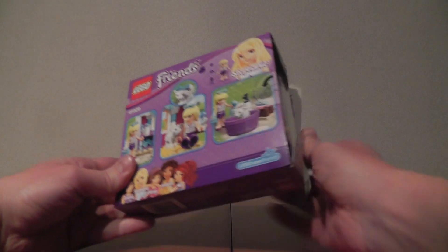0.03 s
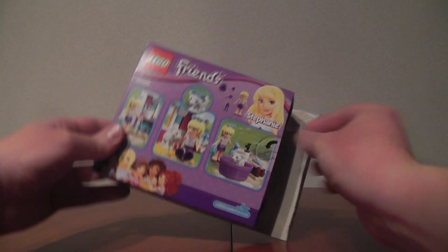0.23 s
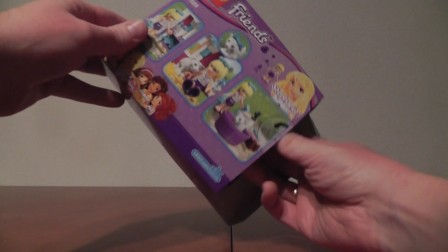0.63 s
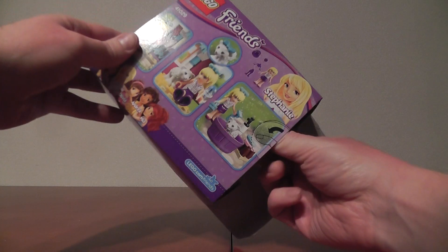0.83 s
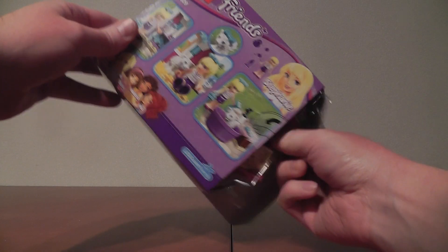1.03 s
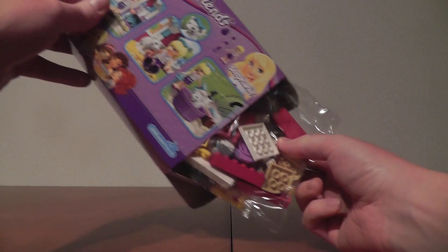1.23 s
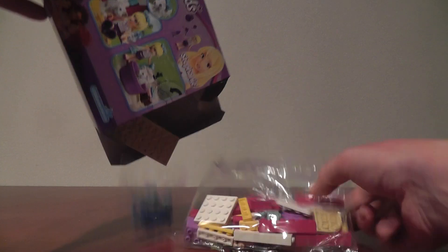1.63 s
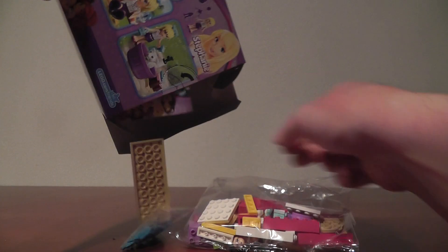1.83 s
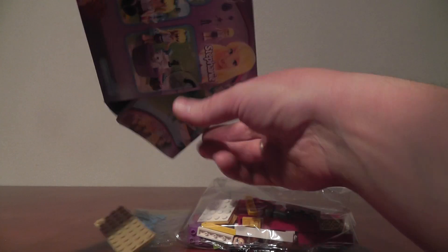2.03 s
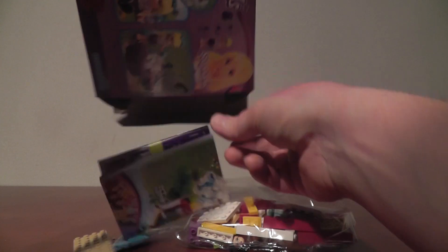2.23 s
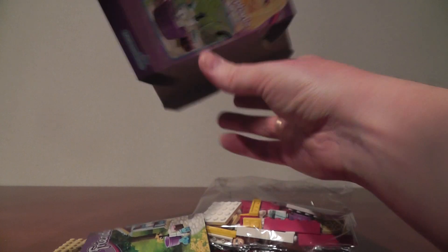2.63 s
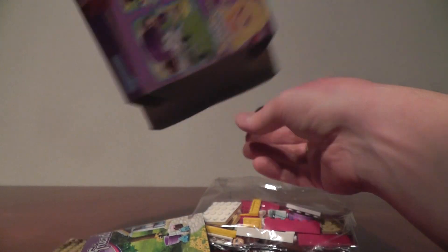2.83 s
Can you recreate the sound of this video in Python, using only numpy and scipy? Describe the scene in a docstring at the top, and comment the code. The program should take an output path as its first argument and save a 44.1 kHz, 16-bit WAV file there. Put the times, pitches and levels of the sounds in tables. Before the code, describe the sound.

A plastic bag of toy bricks crackles close to the microphone as it is pulled from a scraping, knocking cardboard box. It drops on a wooden table, loose parts click after it, and a finger taps the box in a quiet room.

```python
"""A plastic bag of toy bricks, close to the microphone, is pulled from a small cardboard box and
dropped on a wooden table; loose parts and a leaflet follow. The film buckles in dense crackles,
the box knocks and scrapes through its resonances, the bricks click, and short low thuds accompany
the loudest crackles. Last, a finger taps the emptied box. A small, quiet room answers briefly."""
import sys
import numpy as np
from scipy import signal
from scipy.fft import rfft, irfft
from scipy.io import wavfile
from scipy.ndimage import uniform_filter1d, map_coordinates

SR = 44100
rng = np.random.default_rng(int(sys.argv[2]) if len(sys.argv) > 2 else 0)


def to_wav(s):
    """Save 16-bit WAV."""
    ch = np.atleast_2d(s).T  # columns
    pcm = np.round(np.clip(ch, -1, 1) * 32767)  # PCM
    wavfile.write(sys.argv[1], SR, pcm.astype(np.int16))


N = 127890

# Knocks of box and contents. Each row: start in seconds, relative level in dB, pitch in Hz, decay in ms.
BOX_KNOCKS = [(.0774, -45.5, 1050, 6.9), (.151, -44, 404, 3.3), (.2018, -26.5, 473, 7.8),
              (.208, -30, 230, 1.7), (.228, -34.5, 360, 8.3), (0.207, -33.5, 126, 35),
              (.312, -34.5, 700, 21), (.3305, -31.5, 940, 1.7), (.416, -32, 270, 7.6),
              (.429, -30.5, 500, 11), (.4405, -25.5, 405, 5.7), (.472, -30.5, 645, 6.7),
              (.481, -35, 795, 4.2), (.526, -32.5, 510, 5.5), (.605, -30.5, 940, 1.4), (.700, -31, 410, 5),
              (.792, -33.5, 350, 11), (.815, -39.5, 230, 5.9), (.972, -32.5, 405, 1.8),
              (.999, -31, 680, 3.3), (1.473, -33.5, 880, 18), (1.569, -31.5, 1020, 6.6),
              (1.6177, -36.5, 372, 5.5), (1.751, -37, 860, 1.7), (1.964, -38.5, 290, 3.3),
              (2.044, -32, 840, 5.7), (2.238, -34, 680, 6.1), (2.408, -40.5, 240, 0.59),
              (2.4199, -38.5, 900, 1.4), (2.521, -50.5, 202, 3.9)]
# Snaps of film, bricks and card.
# Each row: start in seconds, relative level in dB, tilt in dB per octave, decay in ms.
SHARP_SNAPS = [(0.0778, -51, 2, 2), (0.1758, -47.5, -5.5, 3.3), (0.2038, -46.5, 4, 7),
               (0.331, -38.5, -6.5, 3.5), (.440, -34, -10.5, 5), (0.514, -39, -6.5, 3.1),
               (0.55, -28.5, -4.5, 1.6), (.605, -36, 4.5, 1.7), (0.6982, -31.5, -4, 1.1),
               (0.752, -30.5, -4.5, 1.3), (0.8419, -32, 2.5, 1.2), (0.8655, -29.5, 2.5, 0.24),
               (0.8778, -28.5, 0, 2.4), (0.9038, -32, 2, 3.6), (.950, -39, -8, 0.69),
               (0.963, -30, -6.5, 24), (0.975, -33, -0.5, 2), (1.000, -32, -2.5, 0.98),
               (1.102, -34, -1, 0.91), (1.1542, -30.5, -3, 1.4), (1.1748, -36, 10, 1.2),
               (1.19, -35.5, 9, 1.5), (1.208, -34.5, 9, 7.9), (1.2391, -34, 1, 0.54),
               (1.2516, -31, 1.5, 1.6), (1.293, -33.5, -2, 0.63), (1.376, -32.5, -0.5, 1.8),
               (1.3813, -33, 1.5, 0.9), (1.401, -43, 8, 0.8), (1.4497, -33, -1.5, 1.1),
               (1.4699, -29.5, -4, 2.2), (1.4853, -32, -2, 3.7), (1.4994, -38, -2, 0.79),
               (1.5302, -36, 2, 1.2), (1.6177, -31, -7, 2), (1.642, -35, -3.5, 2.9), (1.655, -34, -1, 2.9),
               (1.684, -29.5, -2, 3), (1.7233, -40.5, -2, 4.3), (1.817, -31.5, -4, 12),
               (2.0212, -34, 0.5, 6), (2.0324, -29, -2.5, 4.3), (2.062, -39.5, -8.5, 2.3),
               (2.1284, -29.5, -0.5, 2.6), (2.207, -39, -9, 4.1), (2.228, -36, -4, 9.6),
               (2.2384, -24, -3, 5.4), (2.2553, -31, -1, 11), (2.3148, -47, 0, 2.5),
               (2.382, -45.5, -0.5, 5.7), (2.4199, -44, -4.5, 1.4), (2.4529, -38, -2, 1.6),
               (2.4923, -39.5, 0.5, 0.65), (2.5864, -44.5, -5, 1.7), (2.7107, -37.5, -0.5, 7.8)]
# Skids. Each row: start in seconds, length in seconds, level in dB, pitch in Hz, nominal width in Hz.
SKIDS = [(0.286, 0.021, -47, 1390, 250), (.511, 0.037, -41, 2700, 220), (.512, 0.04, -39, 6520, 400),
         (0.524, 0.025, -47.5, 11600, 1600), (0.666, 0.028, -43, 6550, 400), (1.470, 0.018, -25, 862, 136),
         (1.914, 0.044, -47, 7350, 1100), (2.595, 0.043, -46.5, 680, 219), (2.648, 0.044, -48, 670, 240)]
# Single blows. Each row: start in seconds, level in dB.
LOW_THUDS = [(0.55, -33.5), (0.604, -35), (0.878, -31.5), (0.976, -39), (1.382, -31), (1.685, -30.5),
             (2.032, -44), (2.243, -33.5), (2.712, -50)]
BRICK_HITS = [(.7595, -30), (1.832, -37.5), (1.9640, -27), (2.036, -36)]  # on each other or the table
FINGER_TAPS = [(2.7106, -27.5)]
# Rubbing between the blows. Each row: time in seconds, relative level in dB.
FILM_LEVELS = [(0, -67.5), (.27, -66), (.40, -61), (.45, -44), (.50, -58.5), (.59, -48.5), (.67, -41.5),
               (.78, -53), (.96, -45), (1.03, -54), (1.14, -50), (1.22, -44.5), (1.36, -45.5), (1.55, -45),
               (1.59, -54), (1.68, -38.5), (1.73, -50), (1.79, -51.5), (1.84, -50.5), (1.90, -58.5),
               (1.99, -57), (2.05, -49), (2.11, -60), (2.15, -46.5), (2.19, -55), (2.26, -43), (2.30, -52),
               (2.35, -57), (2.43, -51), (2.50, -61.5), (2.57, -69.5), (2.66, -57.5), (2.70, -60.5),
               (2.9, -83)]
SCRAPE_LEVELS = [(0, -56.5), (.13, -61.5), (.26, -57), (.38, -51), (.40, -48.5), (.45, -44), (.75, -42.5),
                 (.96, -39), (1.03, -47), (1.13, -39.5), (1.42, -40), (1.65, -44.5), (1.80, -51),
                 (1.91, -58.5), (2.07, -49), (2.22, -45.5), (2.31, -60), (2.42, -46.5), (2.48, -65.5),
                 (2.9, -70)]
PANEL_LEVELS = [(0, -64.5), (.18, -62.5), (.25, -51), (.33, -52), (.38, -63), (.46, -51), (.60, -49.5),
                (.82, -45.5), (1.25, -54.5), (1.63, -47.5), (1.73, -49), (1.83, -50), (1.91, -66),
                (2.05, -51.5), (2.24, -47), (2.34, -59.5), (2.48, -76), (2.66, -52), (2.9, -78)]
# Resonances of the box. Each row: frequency in Hz, width in Hz, gain in dB.
BOX_MODES = [(144, 76, 0), (283.6, 62, 2), (458, 89, -7), (599, 93, -7), (759, 114, 0.5), (856, 32, -0.5),
             (1100, 160, -41), (1395, 120, -4), (1590, 120, -8.5), (2088, 77, -1), (2663, 110, -1.5),
             (3670, 390, -6.5)]
# Modes of a brick and the box's open flap. Each row: frequency in Hz, T60 in seconds, gain in dB.
BRICK_MODES = [(754, 0.084, -14), (904, 0.04, -8), (1428, 0.022, 1.5), (1630, 0.039, 2),
               (2160, 0.017, -0.5), (2672, 0.041, -3.5), (3300, 0.028, -9.5)]
FLAP_MODES = [(270, .05, -21.5), (636, .014, -4), (1090, .009, 2.5), (2240, 0.018, -4.5), (2850, .02, -8.5),
              (3450, 0.012, 0.5), (6670, 0.013, -0.5)]
# Tone of each source at the microphone. Each row: frequency in Hz, gain in dB.
SNAP_TONE = [(200, -13.5), (800, -4), (1500, 0), (2800, -2), (4400, -1.5), (5600, 5), (7600, 6),
             (9500, -0.5), (12500, -4), (16000, -10.5)]
FILM_TONE = [(800, -13), (2500, 1), (3600, 2), (4600, 3), (5600, 5.5), (7600, 5.5), (9200, -9),
             (12500, -4.5), (16000, -20)]
SCRAPE_TONE = [(200, -26.5), (400, -5), (750, -1), (1100, -4), (1600, -3.5), (3500, -22), (8000, -0.5)]
PANEL_TONE = [(30, -28), (110, -8), (280, 3.5), (450, -1.5), (800, -4), (2500, -43.5)]
RATTLE_TONE = [(500, -16), (1300, 5), (2200, 7), (3400, 9), (6000, -6), (14000, -25)]
HUSH_TONE = [(25, -27), (130, 13), (300, -8), (800, -7), (2000, -17), (6000, -29), (16000, -29)]
# Stereo width. Each row: frequency in Hz, gain of the side filter in dB.
SIDE_TONE = [(60, -13), (130, -15), (280, -16), (600, -21), (1100, -8.5), (2500, -9), (5500, -26),
             (9000, -4), (16000, -6.5)]
# The small room's tail. Each row: band centre in Hz, T60 in seconds, level in dB.
ROOM_BANDS = [(135, 0.16, -11.5), (353, 0.1, -6), (900, 0.2, -10), (2470, 0.083, -12), (6100, 0.057, -13.5),
              (13600, 0.07, -10)]

EVENT_SAMPLES = 4096
EVENT_TIME = np.arange(EVENT_SAMPLES) / SR


def undb(db):
    """Decibels to gain."""
    return 10 ** (np.asarray(db) / 20)


def unit(x):
    """Scale to rms 1."""
    return x / np.sqrt(np.mean(x ** 2) + 1e-20)


def freqs(x):
    """Frequency of each bin of a signal."""
    return np.maximum(np.fft.rfftfreq(len(x), 1 / SR), 1)


def colour(points, f):
    """Gain along straight lines through (Hz, dB) points."""
    hz, db = np.array(points).T
    return undb(np.interp(np.log(f), np.log(hz), db))


def band(f, hz, width):
    """Gain of a steep resonance."""
    return 1 / (1 + ((f - hz * hz / f) / width) ** 2 / 2)


def box(f):
    """Gain of the cardboard box's resonances."""
    powers = (undb(db) ** 2 / (1 + ((f - hz * hz / f) / width) ** 2) for hz, width, db in BOX_MODES)
    return np.sqrt(sum(powers))


def shape(x, gain):
    """Causal filter with the given gain per bin."""
    cepstrum = irfft(np.log(gain + 1e-9), len(x))
    cepstrum[1:len(x) // 2] *= 2
    cepstrum[len(x) // 2 + 1:] = 0
    return irfft(rfft(x) * np.exp(rfft(cepstrum)), len(x))


def flatten(x):
    """Level out the broad humps of a short sound's spectrum."""
    power = uniform_filter1d(abs(rfft(x)) ** 2, size=120)
    return shape(x, 1 / np.sqrt(power + 1e-12))


def wander(hold_s):
    """Random values held briefly and slewed; rms 1."""
    hold = int(SR * hold_s)
    steps = np.repeat(rng.standard_normal(N // hold + 1), hold)
    return unit(uniform_filter1d(steps, hold)[:N])


def add_blow(out, start, blow, db, window_s=0.0048):
    """Mix a blow in; db is its rms level if all its energy fell within the window."""
    i = int(start * SR)
    gain = undb(db) * np.sqrt(window_s * SR / np.sum(blow ** 2))
    out[i:i + EVENT_SAMPLES] += gain * blow[:N - i]


def slips(per_s, spread_db=2.5):
    """Random tiny slips, most weak and a few strong."""
    chance, size, sign = rng.random(N), rng.exponential(size=N), rng.choice([-1, 1], N)
    return (chance < per_s / SR) * sign * undb(spread_db * np.minimum(size, 4))


def rub(drive, body, levels, gain_db=1, flex_share=0.07):
    """Slips ring a body whose resonances drift as it bends in the hands, following a level curve."""
    times, level_db = np.array(levels).T
    position = np.cumsum(1 + flex_share * wander(hold_s=0.05))
    flexed = map_coordinates(shape(drive, body), [position], mode="mirror")
    return unit(flexed) * undb(np.interp(np.arange(N) / SR, times, level_db) + gain_db)


def room_hush(level_db=-67.5):
    """The quiet room's steady hush, behind the handling."""
    noise = rng.standard_normal(N)
    return unit(shape(noise, colour(HUSH_TONE, freqs(noise)))) * undb(level_db)


def creases(f):
    """Facets of the film pop one by one, each size at its own pitch."""
    return sum(shape(slips(per_s=28, spread_db=3.5), band(f, hz, width=0.17 * hz)) / np.sqrt(hz)
               for hz in np.geomspace(2800, 14500, 10))


def rustle(surge_db=3, catch_db=1.5):
    """Film crinkles in little avalanches, bricks rattle inside, the bag rubs the card and its panels."""
    f = freqs(np.zeros(N))
    surge = undb(surge_db * wander(hold_s=0.008))
    catch = undb(catch_db * wander(hold_s=0.016))
    film = rub(slips(per_s=3400) * surge, colour(FILM_TONE, f), FILM_LEVELS)
    pops = rub(creases(f) * surge, colour(FILM_TONE, f), FILM_LEVELS, gain_db=-4.5)
    rattle = rub(slips(per_s=600), box(f) * colour(RATTLE_TONE, f), FILM_LEVELS, gain_db=-3.5)
    scrape = rub(slips(per_s=900) * catch, box(f) * colour(SCRAPE_TONE, f), SCRAPE_LEVELS)
    panels = rub(slips(per_s=400, spread_db=3), box(f) * colour(PANEL_TONE, f), PANEL_LEVELS)
    return film + pops + rattle + scrape + panels


def box_knocks(gain_db=1.5, db_per_octave=8.5, width_octaves=0.47):
    """Each contact, a dying flurry of tiny slips, rings the box modes around its own pitch."""
    out, f = np.zeros(N), freqs(EVENT_TIME)
    for start, db, hz, decay_ms in BOX_KNOCKS:
        contact = flatten(rng.standard_normal(EVENT_SAMPLES) * np.exp(-EVENT_TIME * 1000 / decay_ms))
        focus = undb(-db_per_octave * np.hypot(np.log2(f / hz), width_octaves))
        add_blow(out, start, shape(contact, box(f) * focus), db + gain_db)
    return out


def snaps(gain_db=1, rise_ms=0.49, tick_spread_db=4, ripple_db=4.5):
    """Creases snap through and bricks click: bright bursts of uneven ticks, each with its own colour."""
    out, f = np.zeros(N), freqs(EVENT_TIME)
    lead_s = 256 / SR  # time for the rise before the peak
    ms = (EVENT_TIME - lead_s) * 1000
    ripple_hz = np.geomspace(800, 16000, 18)
    for start, db, tilt_db, decay_ms in SHARP_SNAPS:
        envelope = np.exp(np.minimum(ms / rise_ms, -ms / decay_ms))
        envelope *= undb(tick_spread_db * wander(hold_s=0.001)[:EVENT_SAMPLES])
        ripple = list(zip(ripple_hz, ripple_db * rng.standard_normal(len(ripple_hz))))
        tilt = undb(tilt_db * np.log2(np.maximum(f, 1000) / 5000))
        ticks = flatten(rng.choice([-1, 1], EVENT_SAMPLES) * envelope)
        snap = shape(ticks, colour(SNAP_TONE, f) * colour(ripple, f) * tilt)
        add_blow(out, start - lead_s, snap, db + gain_db)
    return out


def skids(edge_s=0.0085, sag_share=0.063, stutter_db=2.5):
    """Stuttering stick-slip keeps one resonance ringing; the pitch sags as the skid slows."""
    out, t = np.zeros(N), EVENT_TIME
    for start, length, db, hz, width in SKIDS:
        gate = np.clip(np.minimum(t, length - t) / edge_s, 0, 1)
        friction = slips(per_s=2500, spread_db=1)[:EVENT_SAMPLES]
        ring = signal.hilbert(shape(friction, band(freqs(t), hz, width)))
        shift_hz = hz * sag_share * (0.5 - t / length)
        sag = np.exp(2j * np.pi * np.cumsum(shift_hz) / SR)
        stutter = undb(stutter_db * wander(hold_s=0.0098)[:EVENT_SAMPLES])
        skid = (ring * sag).real * gate * stutter
        skid *= undb(db) * np.linalg.norm(gate) / np.linalg.norm(skid)
        i = int(start * SR)
        out[i:i + EVENT_SAMPLES] += skid[:N - i]
    return out


def low_thuds(hz=74.4, decay_ms=1.77, right_phase_rad=2.25):
    """Short low thuds at the microphone accompany the loudest crackles, out of step left and right."""
    out, t = np.zeros((2, N)), EVENT_TIME
    phase = 2 * np.pi * hz * t
    swell = t * np.exp(-t * 1000 / decay_ms)
    for start, db in LOW_THUDS:
        add_blow(out[0], start, np.sin(phase) * swell, db)
        add_blow(out[1], start, np.sin(phase + right_phase_rad) * swell, db)
    return out


def clacks(blows, modes, contact_ms):
    """One short push rings the modes of a brick or the flap; a longer contact is duller."""
    out, t = np.zeros(N), EVENT_TIME
    ring = sum((-1) ** k * undb(db - 60 * t / t60) * np.sin(2 * np.pi * hz * t)
               for k, (hz, t60, db) in enumerate(modes))
    push = np.exp(-t * 1000 / contact_ms)
    clack = signal.fftconvolve(push, ring)[:EVENT_SAMPLES]
    for start, db in blows:
        add_blow(out, start, clack, db)
    return out


def stereo_spread(near, shift_s=0.0098):
    """Sounds reach the microphone from shifting places on bag and box, so left and right differ."""
    analytic = signal.hilbert(shape(near, colour(SIDE_TONE, freqs(near))))
    side = analytic.real * np.tanh(wander(shift_s)) + analytic.imag * np.tanh(wander(shift_s))
    return np.array([near + side, near - side])


def small_room(near, delay_s=0.004):
    """The walls return a short diffuse tail with its own decay and level in each band."""
    t = np.arange(SR // 2) / SR
    noise, tail = rfft(rng.standard_normal(len(t))), 0
    log_centres = np.log([row[0] for row in ROOM_BANDS])
    for share, (_, t60, db) in zip(np.eye(len(ROOM_BANDS)), ROOM_BANDS):
        fall = undb(-60 * t / t60) * (t > delay_s)
        crossover = np.interp(np.log(freqs(t)), log_centres, share)
        tail = tail + irfft(noise * crossover, len(t)) * fall / np.linalg.norm(fall) * undb(db)
    return signal.fftconvolve(near, tail)[:N]


def scene():
    """Bag, box and bricks at the table, close up in stereo, with the small room behind."""
    near = box_knocks() + snaps()
    near += clacks(BRICK_HITS, BRICK_MODES, contact_ms=0.33)
    near += clacks(FINGER_TAPS, FLAP_MODES, contact_ms=0.072)
    near += skids() + rustle()
    direct = stereo_spread(near) + low_thuds()
    ambience = np.array([small_room(near) + room_hush() for _ in range(2)])
    return direct + ambience


def record(dry):
    """The recorder cuts the top steeply above 15.9 kHz."""
    return signal.sosfilt(signal.ellip(10, .2, 70, 15900, fs=SR, output="sos"), dry)


dry = scene()
out = record(dry)
to_wav(out)
```